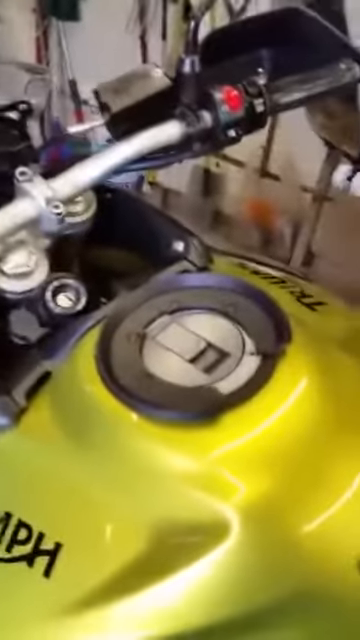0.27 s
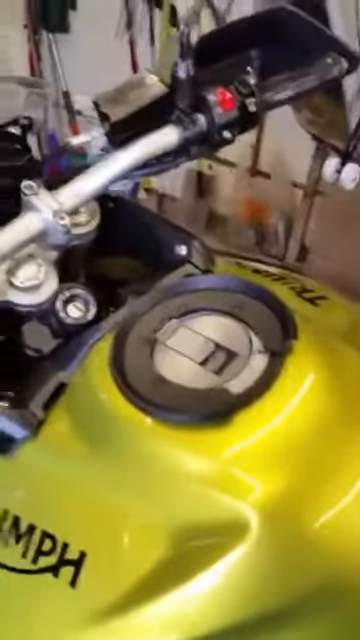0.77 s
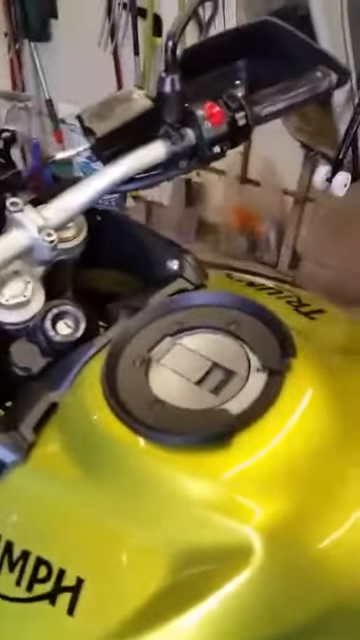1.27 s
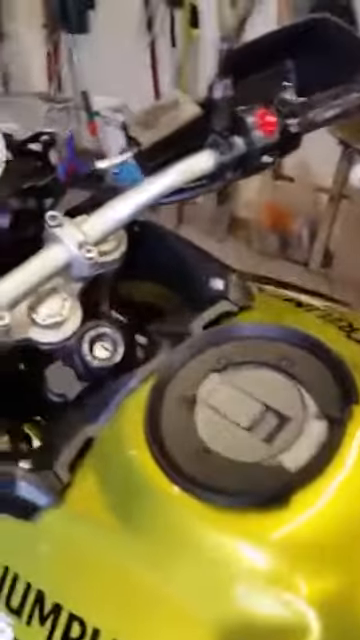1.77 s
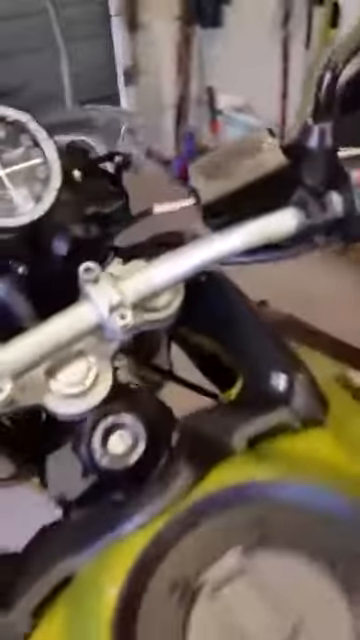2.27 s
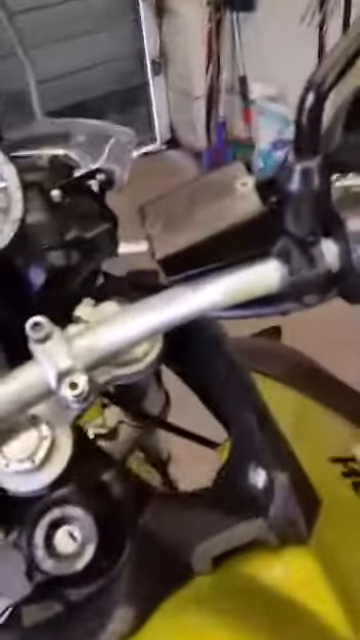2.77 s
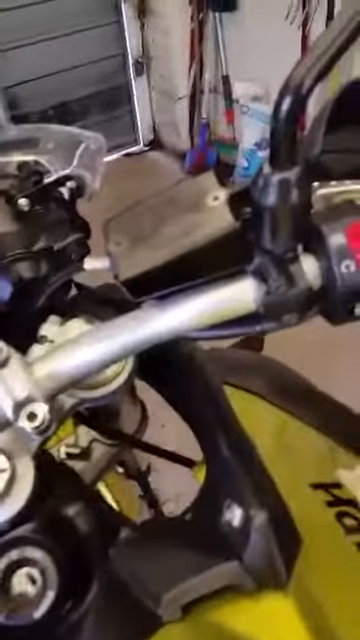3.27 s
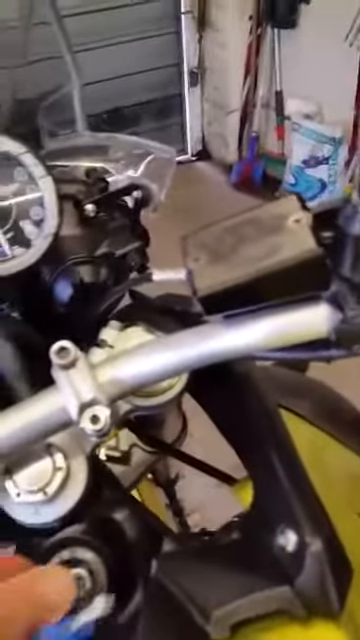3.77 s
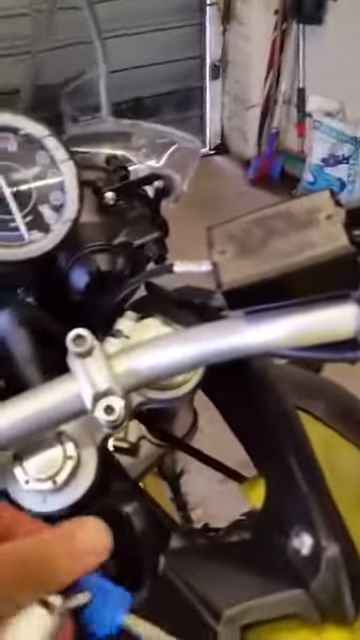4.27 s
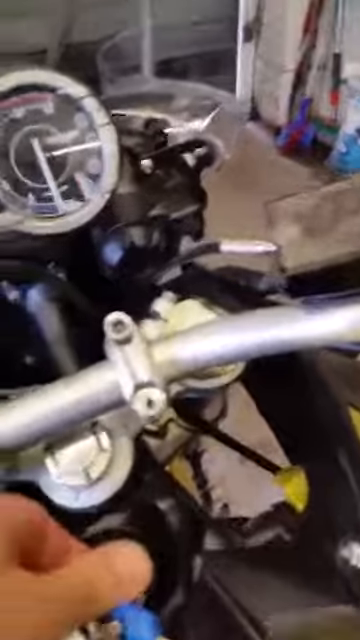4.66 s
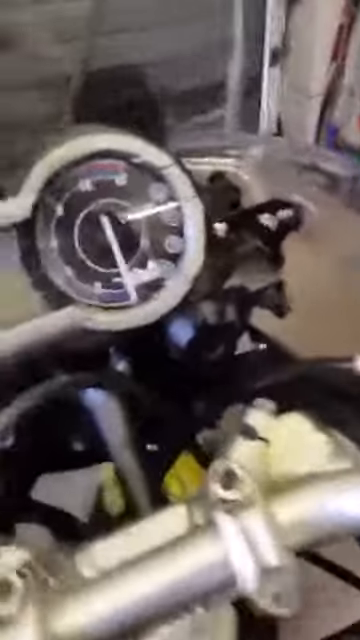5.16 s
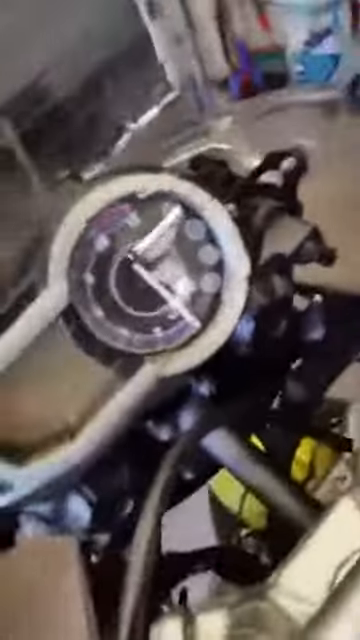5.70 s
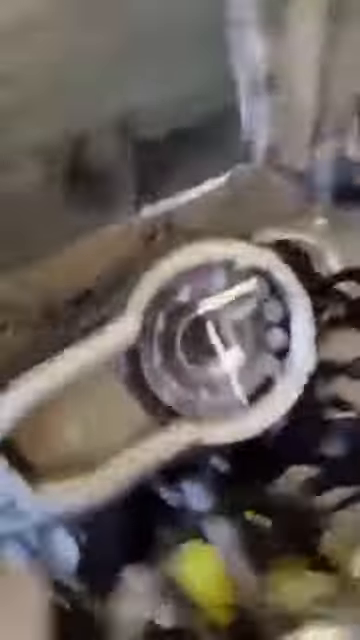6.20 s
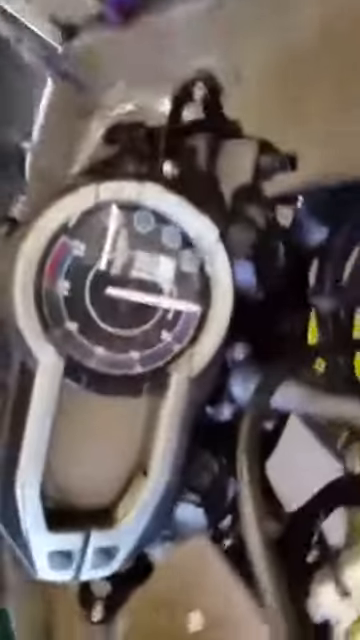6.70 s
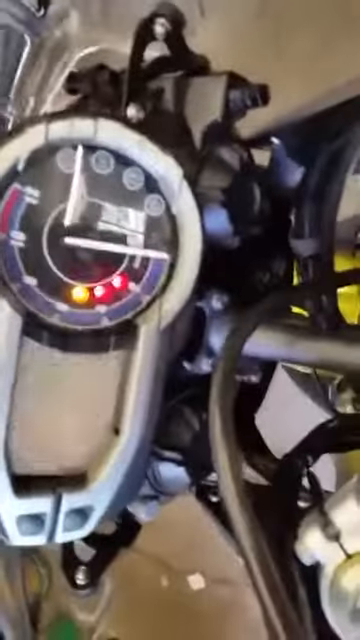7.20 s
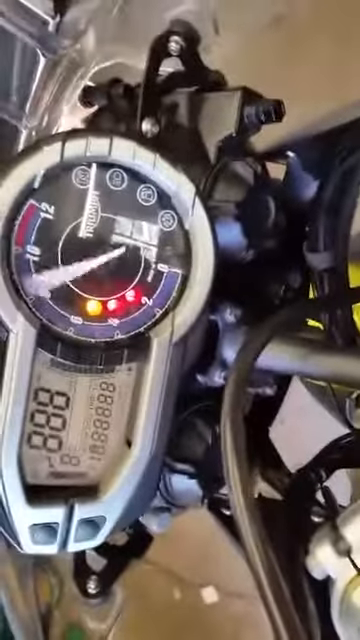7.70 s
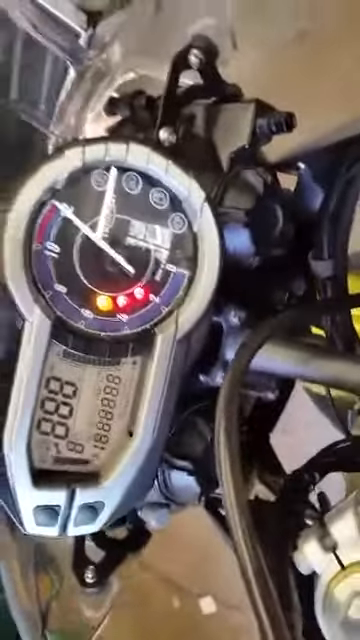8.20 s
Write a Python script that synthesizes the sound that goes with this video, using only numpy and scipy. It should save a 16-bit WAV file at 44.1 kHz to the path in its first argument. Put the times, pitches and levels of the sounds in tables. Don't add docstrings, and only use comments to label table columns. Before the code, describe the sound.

In a quiet humming garage, keys jingle softly, one scrapes into a metal lock, rattles about and snaps round with loud hollow clunks.

```python
import sys
import numpy as np
from scipy import signal
from scipy.fft import rfft, irfft
from scipy.io import wavfile
from scipy.ndimage import uniform_filter1d

SR = 44100
rng = np.random.default_rng(int(sys.argv[2]) if len(sys.argv) > 2 else 0)


def materialize(psi):
    bounded = np.clip(np.atleast_2d(psi).T, -1, 1)
    quanta = np.round(bounded * 32767).astype(np.int16)
    wavfile.write(sys.argv[1], SR, quanta)


def how_loud(loudness_db):
    steps = np.asarray(loudness_db, float) / 20
    return 10 ** steps


N = 372644


def evened(x):
    return x / np.sqrt(np.mean(x ** 2) + 1e-20)


def peaked(x):
    return x / (abs(x).max() + 1e-12)


def read(points, hz):
    f, value = np.transpose(points)
    return np.interp(np.log(hz + 1), np.log(f + 1), value)


def coloured(x, points):
    n = x.shape[-1]
    return irfft(rfft(x) * how_loud(read(points, np.fft.rfftfreq(n, 1 / SR))), n)


def follow(rows):
    when, level_db = np.transpose(rows)
    return np.interp(np.arange(N) / SR, when, level_db)


def ring(hz, db, t60, seconds):
    t = np.arange(round(seconds * SR))[:, None] / SR
    fading = how_loud(db - 60 * t / np.maximum(t60, .002))
    return (fading * np.sin(2 * np.pi * hz * t)).sum(1)


def grains(per_s, spread_db):
    size = how_loud(spread_db * np.minimum(rng.exponential(1, N), 4))
    return size * rng.choice([-1., 1.], N) * (rng.random(N) < per_s / SR)


# time_s, left_delay_samples, left_over_right_db
PLACE = [
    (0, 18, -14),
    (2.9, 19, -15),
    (3.199, 6.5, -4.5),
    (4.602, 5.5, -9.5),
    (5.202, 10.5, -11),
    (6.2, 13, -2.5),
    (6.7, 2, -4.5),
    (7.3, 0.5, -4.5),
    (7.697, 8.5, -3),
]


def add(mix, s, sound, pan_db=None):
    when, late, lean_db = np.transpose(PLACE)
    if pan_db is None:
        pan_db = np.interp(s, when, lean_db)
    at = round(s * SR)
    left_at = at + round(np.interp(s, when, late))
    for channel, start, db in ((0, left_at, pan_db / 2), (1, at, -pan_db / 2)):
        part = mix[channel, start:][:len(sound)]
        part += how_loud(db) * sound[:len(part)]


# pitch_hz, level_db (per Hz)
AIR = [(35, -23), (60, 9.5), (94, -2.5), (198, -8.5), (244, -2), (301, -10), (346, -18.5), (408, -17),
       (458, -19.5), (1040, -34.5), (6000, -51.5), (8000, -39.5), (14200, -42), (15300, -51)]
# pitch_hz, level_db (rms)
HUM = [(100, -93), (200, -77.5), (300, -76.5), (400, -87.5), (500, -98.5)]
# pitch_hz, level_db (per Hz)
WHINE = [(1800, -16), (2050, -11), (2300, -18.5), (2900, -25.5), (3750, -14), (4600, -25.5)]
AIR_DB, WHINE_DB = -73.5, -88


def stillness():
    a, b, c = rng.standard_normal((3, N))
    air = how_loud(AIR_DB) * evened(coloured(np.array([a + 0.2 * b, a - 0.09 * b]), AIR))
    waver = evened(uniform_filter1d(uniform_filter1d(c, 4000), 4000))
    t = np.arange(N) / SR
    hum = np.zeros((2, N))
    for hz, db in HUM:
        cycles = hz * t + rng.random((2, 1)) * 0.24
        hum += how_loud(db + 2.4 * waver) * np.sqrt(2) * np.sin(2 * np.pi * cycles)
    whine = how_loud(WHINE_DB) * evened(coloured(np.array([b, c]), WHINE))
    return air + hum + whine


# start_s, length_s, from_hz, to_hz, level_db (rms)
SONG = [
    (2.06, 0.14, 2070, 2175, -76),
    (2.223, 0.067, 1965, 2057, -83.5),
    (2.332, 0.15, 1980, 1997, -86),
    (2.712, 0.054, 2150, 1890, -79.5),
    (2.792, 0.097, 1680, 1650, -90.5),
    (2.99, 0.1, 2080, 2180, -95),
    (3.105, 0.096, 2250, 2660, -94.5),
    (3.176, 0.1, 2780, 2670, -92),
    (3.249, 0.068, 2730, 2810, -90.5),
    (3.254, 0.083, 2880, 2970, -96),
]
WARBLE_HZ, WARBLE_DEPTH = 37.9, 0.029


def bird():
    out = np.zeros((2, N))
    for s, length, from_hz, to_hz, db in SONG:
        u = np.arange(0, 1, 1 / (length * SR))
        t = s + length * u
        weak = db < -76
        wobble = 2 * np.pi * WARBLE_HZ * length * u + 1.5 * np.sin(2 * np.pi * 61 * t)
        hz = to_hz + (from_hz - to_hz) * (1 - u) ** 2
        hz = hz * (1 + WARBLE_DEPTH * weak * np.sin(wobble))
        shape = np.minimum(u / 0.38, 1) * np.minimum((1 - u) * length / 0.011, 1)
        shape *= 1 + .9 * weak * np.sin(2 * np.pi * 47 * t + 3 * np.sin(2 * np.pi * 17 * t))
        whistle = np.sin(2 * np.pi * np.cumsum(hz) / SR)
        add(out, s, how_loud(db + 6.0) * shape * whistle, -2.5)
    return out


# pitch_hz, t60_s
GARAGE = [(300, 0.45), (1000, 0.22), (3000, 0.23), (8000, 0.22), (15000, 0.26)]


def garage(x):
    taps = np.zeros((3, 2, 24000))
    at = np.arange(200, 23980, 20) + rng.integers(0, 20, (3, 2, 1189))
    np.put_along_axis(taps, at, rng.choice([-1., 1.], at.shape), 2)
    hz, t, z = signal.stft(taps, SR, nperseg=256)
    fading = how_loud(-60 * t / read(GARAGE, hz)[:, None])
    tails = signal.istft(z * fading, SR, nperseg=256)[1]
    tails = tails / np.linalg.norm(tails[0, 0])
    turn = np.pi * (np.arange(N) / SR * 7 + np.arange(3)[:, None] / 3)
    fed = x[1] * np.cos(turn) * np.sqrt(2 / 3)
    return signal.fftconvolve(fed[:, None], tails, axes=2)[..., :N].sum(0)


# time_s, level_db
GRIP = [(0, -61.5), (.56, -58.5), (1.2, -71.5), (1.55, -60.5), (1.9, -60.5), (2.4, -66.5), (3.1, -74),
        (3.95, -69.5), (4.31, -59.5), (5.27, -52), (5.8, -57.5), (5.93, -46.5), (6.1, -55), (6.7, -53),
        (7.3, -62.5), (8.45, -67.5)]
# pitch_hz, level_db (per Hz)
RUMBLE = [(8.8, -12.5), (15, -3.5), (45, 1.5), (108, -3.5), (172, -5), (207, -4), (238, -15.5), (300, -6.5),
          (344, -15.5), (600, -22.5), (780, -44), (1320, -120)]
# start_s, peak_db, pitch_hz, left_over_right_db
THUMPS = [(1.307, -51, 134, 19), (1.735, -45, 176, 15), (1.782, -44, 84, 23), (1.823, -43.5, 119, 17),
          (1.966, -44.5, 103, 18), (2.345, -52.5, 82.6, 28), (2.667, -40, 332, -2),
          (3.253, -35.5, 96, 14.5), (3.598, -40.5, 89.6, 16), (4.772, -48, 64, 3), (5.18, -32, 183, -5),
          (5.752, -42.5, 134.5, 26), (5.795, -47.5, 127, 37), (5.938, -36, 57, 26.5), (5.972, -31, 111, 21),
          (6.282, -25, 223, -3), (8.027, -34.5, 180, 14), (8.331, -45.5, 122.6, 12)]


def handling():
    a, b, c = rng.standard_normal((3, N))
    lumps = evened(uniform_filter1d(uniform_filter1d(c, 1200), 1200))
    rumble = evened(coloured(np.array([a + .2 * b, b]), RUMBLE))
    out = rumble * how_loud(2.5 * lumps) * how_loud(follow(GRIP))
    for s, peak_db, hz, pan_db in THUMPS:
        cycles = np.arange(round(2.4 * SR / hz)) * hz / SR
        shape = np.sqrt(cycles) * (1 - cycles / cycles[-1]) ** 2.97
        bump = np.sin(2 * np.pi * cycles ** 0.77) * shape
        add(out, s, how_loud(peak_db) * bump, pan_db)
    return out


# time_s, level_db
RUSTLE = [(0, -77), (.15, -89), (.42, -71), (.6, -76), (.74, -81.5), (.83, -88), (.92, -82.5), (1.1, -94),
          (1.43, -100), (1.63, -87.5), (1.8, -85.5), (2.35, -89), (2.6, -94), (2.73, -99.5), (2.9, -100.5),
          (3.3, -106)]
# pitch_hz, level_db (per Hz)
CLOTH = [(210, -43.5), (350, 0), (643, -5), (950, -8.5), (1680, -17.5), (6430, -23), (9140, -20.5),
         (14500, -11), (15000, -15.5), (15500, -54)]


def rustle():
    a, b = grains(11000, 3), grains(8000, 3)
    cloth = evened(coloured(np.array([np.roll(a, 17) + 2.3 * b, a - 0.061 * b]), CLOTH))
    t = np.arange(N) / SR
    moving = (t >= RUSTLE[0][0]) * (t < RUSTLE[-1][0])
    return how_loud(12.5) * how_loud(follow(RUSTLE)) * moving * cloth


# start_s, peak_db, centre_hz
SKITTERS = [(1.598, -61, 6000), (2.7265, -55, 13500), (4.384, -51.5, 9000), (4.512, -44, 12200),
            (4.522, -41, 12000), (4.528, -34.5, 12400), (4.533, -44.5, 12000), (4.549, -35, 11080),
            (4.563, -45.5, 11000), (4.5692, -32, 8100), (4.584, -41.5, 9000), (4.83, -64, 10800),
            (4.858, -51, 12000), (4.938, -49, 12500), (4.947, -53, 12500)]


def skitters():
    out, t = np.zeros((2, N)), np.arange(500) / SR
    for (s, db, hz), draw in zip(SKITTERS, rng.standard_normal((len(SKITTERS), len(t)))):
        band = [(hz / 3, -22), (hz * .8, 0), (hz * 1.2, 0), (hz * 2, -10)]
        add(out, s, how_loud(db) * peaked(coloured(draw, band) * how_loud(-60 * t / .016)))
    return out


# pitch_hz, level_db
SHEEN = [(3910, -12), (5970, 1.5), (9860, 1.5), (11000, -3.5), (11900, 5), (12900, 0), (13900, 2),
         (14700, -1.5)]
SHEEN_WIDTH_HZ = 260
# start_s, level_db (rms), t60_s
SHIVERS = [
    (7.083, -34, 0.39),
    (7.107, -38, 0.29),
    (4.404, -56.5, .3),
]


def shimmer():
    out, t = np.zeros((2, N)), np.arange(16000) / SR
    f = np.fft.rfftfreq(len(t), 1 / SR)
    bands = sum(how_loud(db) / (1 + (2 * (f - hz) / SHEEN_WIDTH_HZ) ** 2) for hz, db in SHEEN)
    for (s, db, t60), draw in zip(SHIVERS, rng.standard_normal((len(SHIVERS), len(t)))):
        jangle = evened(irfft(rfft(draw) * bands))
        add(out, s, jangle * how_loud(db - 60 * t / t60) * (1 - np.exp(-t / .003)))
    return out


# pitch_hz, level_db, t60_s
SMALL_KEY = [(4850, -26, .05), (8360, -4, .09), (9560, -6, .05), (9540, -9, .15), (10980, 8, .085),
             (14360, 4, .11)]
LONG_KEY = [(5033, -30, .05), (7090, -16.5, .05), (10690, -5.5, .1), (11850, -8.5, .12), (12200, 3.5, .08),
            (12000, -1, .09), (14000, -8, .1), (13440, -5.5, .12)]
# pitch_hz, level_db (per Hz)
TICK = [(1400, -42.5), (2600, 0), (5500, 3.5), (8500, 5)]


def key_touch(ring_db, long_db, tick_hz, tick_db, noisiness, luck):
    hz, db, t60 = np.transpose(SMALL_KEY + LONG_KEY)
    on_long = np.arange(len(hz)) >= len(SMALL_KEY)
    share, bend, noise = np.split(luck, [len(hz), 2 * len(hz)])
    t = np.arange(len(noise)) / SR
    struck_db = db + long_db * on_long + 1.8 * share

    sound = how_loud(ring_db) * peaked(ring(hz * (1 + .002 * bend), struck_db, t60, .25))
    flutter = np.interp(np.linspace(0, 70, len(sound)), np.arange(len(noise)), noise)
    sound *= 1 + .5 * flutter
    sound[:len(t)] *= 1 - np.exp(-t / .0006)

    snap = ring(hz * (1 + .02 * bend), struck_db, .014, len(t) / SR) * .3
    snap = peaked(snap + noisiness * noise * how_loud(-60 * t / .007))
    snap = coloured(snap, [(6000, -37), (9000, 14)])
    snap *= np.sqrt(max(1 - how_loud(2 * min(tick_db, 0)), .03))

    tick = peaked(coloured(noise[::-1] * how_loud(-60 * t / .005), TICK))
    band = [(tick_hz / 3, -45), (tick_hz / 1.5, -14), (tick_hz, 0), (tick_hz * 1.9, -16)]
    tick = peaked(tick + 0.61 * peaked(coloured(noise * how_loud(-60 * t / 0.015), band)))
    sound[:len(t)] += (snap + how_loud(tick_db + 5.5) * tick) * np.cos(np.pi / 2 * t / t[-1])
    return sound


# start_s, peak_db, ring_over_snap_db, long_over_small_key_db
JINGLES = [(0.048, -50.5, -5, -18), (0.065, -60, 19, -15), (0.649, -69, 17, 6), (0.6838, -58, 16, 10),
           (0.7085, -51, 14, 8), (0.717, -57, 14, 5), (0.7247, -43.5, 6, 3), (0.744, -49.5, 2, -10),
           (0.84, -67, -1, -6), (0.857, -50, 15.5, -3), (0.873, -61, 2, -6), (0.9067, -37.5, 9.5, -12),
           (0.9294, -52, 0, -6), (0.95, -60, -8, -6), (1.189, -70, 6, -16)]
# start_s, peak_db, ring_over_snap_db, long_over_small_key_db
TOSSED = [
    (1.455, -33.5, -3, 0.5),
    (1.4989, -25.5, -17, 0.5),
    (1.5063, -43.5, -15, 1.5),
    (1.5255, -47.5, -14, 2),
    (2.8435, -68, -12, -1.5),
    (4.508, -34.5, -15, 7.5),
    (4.818, -57, -16, -6.5),
    (4.8838, -59, -13, 0),
    (4.9424, -55, -12, -3),
    (4.9543, -43, -10, -4),
]
# start_s, peak_db, ring_over_snap_db, tick_hz
PINCHED = [(1.479, -54, -25, 3000), (1.549, -53, -20, 5000), (1.554, -44, -22, 5170),
           (1.5596, -37.5, 6, 5400), (1.578, -37.5, -20, 5570), (1.586, -55, -20, 5000),
           (1.6079, -24.5, -18, 5740), (1.618, -48, -20, 3630), (1.625, -39.5, -23, 4360),
           (1.6284, -44, -15, 4500), (1.671, -52, -16, 4000), (1.794, -48.5, -20, 3450),
           (1.855, -62, -25, 5540), (1.891, -62, -16, 5660), (1.899, -56.5, -26, 3260),
           (1.911, -66, -25, 3400), (1.932, -54, -24, 4050), (1.993, -58, -25, 2950),
           (2.004, -62, -21, 3400), (2.019, -64, -20, 3300), (2.061, -65.5, -20, 5000),
           (2.129, -65, -24, 2980), (2.178, -67, -25, 5000), (2.184, -59, -31, 3500),
           (2.245, -69, -16, 5270), (2.45, -67, -30, 6000), (2.72, -48, 6, 3580), (3.372, -68, -25, 4600),
           (4.54, -52, -10, 6050), (4.576, -41, -26, 5000), (4.9662, -47, -4, 4350),
           (7.8244, -38, -32, 5960)]
LOOSE_TICK_HZ = 5000
DANGLING_TICK_DB, LOOSE_TICK_DB, PINCHED_TICK_DB = -32, -11.5, 0


def clinks():
    out = np.zeros((2, N))
    touches = [(*row, LOOSE_TICK_HZ, DANGLING_TICK_DB, .25) for row in JINGLES]
    touches += [(*row, LOOSE_TICK_HZ, LOOSE_TICK_DB, .9) for row in TOSSED]
    for s, peak_db, ring_db, tick_hz in PINCHED:
        touches.append((s, peak_db, ring_db, 0, tick_hz, PINCHED_TICK_DB, .25))
    luck = rng.standard_normal((len(touches), 2 * len(SMALL_KEY + LONG_KEY) + 600))
    for (s, peak_db, *touch), draw in zip(touches, luck):
        add(out, s, how_loud(peak_db) * key_touch(*touch, draw))
    return out


# pitch_hz, level_db, t60_s
FRAME = [(452, 1.5, 0.22), (488.4, 7.5, 0.13), (636.3, 4.5, 0.17), (760.5, 1.5, 0.22), (830, 19.5, 0.0077),
         (1000, 6.5, 0.056), (1186.5, 6, 0.053), (1318, 10, 0.033), (1412, 2, 0.076), (1634, 1, 0.075),
         (2150, -23.5, 0.12), (350, 5.5, 0.15), (2710, -18.5, 0.06), (3700, -32, 0.011)]
# pitch_hz, level_db, t60_s
PINS = [(2170, -6.5, 0.012), (2576, -7, 0.016), (2948, 1.5, 0.0099), (4050, -12.5, 0.019)]
# pitch_hz, level_db (per Hz)
EDGE = [(1200, -9.5), (1800, 1.5), (2400, 7.5), (3000, 3), (4200, -5), (5000, -32), (8000, -57)]
# pitch_hz, level_db (per Hz)
CRACK = [(1530, -36), (2600, -6), (4330, -5), (6050, -8), (7890, -7), (9190, -10.5), (9690, -4.5),
         (14300, -3), (15500, -8.5), (16000, -42.5)]


def jolt(row, swell, first, luck):
    peak_db, pitch_hz, edge_db, crack_db = row
    hz, db, t60 = np.transpose(FRAME)
    n = len(swell)
    share, dice, noise, fizz = np.split(luck, len(FRAME) + n * np.arange(3))
    blows = swell * noise * (dice > (1.6 if first else 0.7))
    blows[0] = first

    near_db = -15 * abs(np.log2(hz / pitch_hz))
    barrel = ring(pitch_hz, 0, .015, .25)
    body = barrel + how_loud(-6.0) * ring(hz, db + near_db + 0.66 * share, t60, .25)
    band = [(pitch_hz / 3, -21), (pitch_hz * .8, 0), (pitch_hz * 1.6, 0), (pitch_hz * 3, -14),
            (pitch_hz * 6, -32)]
    body = coloured(np.roll(body, 40), band)
    body *= np.linspace(1, 0, len(body)) ** 2
    sound = peaked(signal.fftconvolve(blows, body))[40:]

    late = swell * (1 - np.exp(-np.arange(n) / SR / 0.001))
    pins = signal.fftconvolve(noise * late, ring(*np.transpose(PINS), .03))[:n]
    edge_colour = [(f * (pitch_hz / 1000) ** .4, v) for f, v in EDGE]
    edge = peaked(coloured(noise * late, edge_colour))
    crack_colour = [(f, v + 0.5 * crack_db * np.log2(f / 5000)) for f, v in CRACK]
    sound[:n] += how_loud(edge_db + 2.5) * peaked(edge + 0.53 * peaked(pins))
    sound[:n] += how_loud(crack_db + 2.5) * peaked(coloured(fizz * late, crack_colour))
    return how_loud(peak_db) * sound


HARD_DB = -24.5
CHATTER_S, HARD_CHATTER_S = 0.0073, 0.0023


def blow(row, draw):
    hard = row[0] > HARD_DB
    u = np.arange(3000) / SR / (HARD_CHATTER_S if hard else CHATTER_S)
    swell = (1 - np.exp(-(5.5 if hard else 3.0) * u)) * np.exp(-u)
    return jolt(row, swell, 0.36 + 0.8 * hard, draw)


# start_s, peak_db, barrel_hz, rattle_edge_db, metal_crack_db
EXTRA_BLOWS = [
    (4.128, -30, 503, -30, -44),
    (4.162, -40, 477, -29, -50),
    (4.406, -24.5, 473, -30, -47.5),
    (5.018, -27, 505, -34, -50),
    (5.246, -31.5, 892, -7, -40),
    (7.077, -30.5, 900, -12.5, -15),
    (7.129, -25, 1307, -18.5, -41),
    (7.69, -29, 624.6, -31, -48.5),
    (7.722, -28, 638, -30, -48),
]


def extra_blows():
    out = np.zeros((2, N))
    for (s, *row), draw in zip(EXTRA_BLOWS, rng.standard_normal((len(EXTRA_BLOWS), len(FRAME) + 9000))):
        add(out, s, blow(row, draw))
    return out


# pitch_hz, level_db, t60_s
BARREL = [(1190, 3, 0.012), (1307, 2, 0.024), (1430, 3, 0.0095), (2500, -16.5, 0.037)]
# start_s, length_s,
# drag_db, glide_fizz_db, barrel_buzz_db
STROKES = [(0.655, 0.32, -99, -64.5, -99), (0.843, 0.37, -99, -69.5, -99), (1.448, 0.33, -99, -62, -99),
           (1.53, 0.47, -99, -63, -99), (2.257, 0.55, -99, -76.5, -99), (2.664, 0.223, -68.5, -83.5, -99),
           (4.121, 0.29, -38.5, -45.5, -47), (4.362, 0.41, -42.5, -50.5, -72),
           (4.546, 0.041, -51, -49.5, -45.5), (4.689, 0.71, -66.5, -77.5, -72.5),
           (4.93, 0.72, -51, -85, -71), (5.211, 0.49, -44.5, -68, -71), (5.446, 2.45, -65.5, -79.5, -86.5),
           (6.457, 0.18, -62, -100, -55.5), (6.605, 0.2, -59, -97.5, -54), (6.694, 0.53, -47, -74, -65),
           (6.981, 0.33, -63, -85, -46.5), (7.083, 0.24, -43.5, -40, -57),
           (7.199, 0.71, -71.5, -79.5, -73.5), (7.383, 0.07, -76, -86, -62), (7.59, 0.17, -65, -89, -68),
           (7.655, 0.5, -47.5, -82, -54), (7.804, 0.18, -57, -79, -44), (7.93, 0.87, -76.5, -81.5, -88)]
STROKE_LEAN = 0.35


def scrape():
    hz, db, t60 = np.transpose(FRAME)
    slips = grains(1500, 2)
    drag = evened(signal.oaconvolve(slips, ring(hz, db, 0.051 * t60, 0.065))[:N])
    drag = drag + how_loud(-6.0) * evened(coloured(slips, EDGE))
    buzz = evened(signal.oaconvolve(slips[::-1], ring(*np.transpose(BARREL), .06))[:N])
    pressed, gliding, buzzing, bright = np.zeros((4, N))
    for start, length, drag_db, fizz_db, buzz_db in STROKES:
        u = np.clip((np.arange(N) / SR - start) / length, 0, 1)
        arch = np.sin(np.pi * u ** STROKE_LEAN) ** 2
        pressed += how_loud(drag_db) * arch
        gliding += how_loud(fizz_db) * arch
        buzzing += how_loud(buzz_db) * arch
        bright += how_loud(fizz_db) * arch ** 1.1
    fizz = np.array([evened(coloured(grains(10000, 2.6), CRACK)) for side in "LR"])
    dull = coloured(fizz, [(7000, -8.5), (12000, -15.5)])
    fizz = dull * gliding + (fizz - dull) * bright
    return np.array([np.roll(drag, 8), drag]) * pressed + np.array([np.roll(buzz, 4), buzz]) * buzzing + fizz


# start_s, peak_db, barrel_hz, rattle_edge_db, metal_crack_db
SEATING = [(3.376, -71, 892, -9, -7), (3.846, -64.5, 625, -32, -13.5), (4.068, -53, 411, -21, -17.5),
           (4.128, -19, 830, -14.5, -7), (4.149, -29, 680, -10.5, -9), (4.365, -43.5, 690, 5, 1),
           (4.404, -14.5, 934, -7, -2), (4.43, -30.5, 830, -13, -28.5), (4.484, -29.5, 875, -11, -28),
           (4.761, -47.5, 900, -31, -24), (4.855, -36.5, 760, -29, -48), (5.227, -29.5, 683, -12.5, -38),
           (5.362, -20.5, 1070, -19.5, -41), (5.663, -50, 796, -18.5, -19),
           (5.959, -43.5, 590, -14.5, -48.5), (6.004, -36, 1000, -19.5, -54), (6.339, -46, 591, -15.5, -38)]
# start_s, peak_db, barrel_hz, rattle_edge_db, metal_crack_db
DETENTS = [(6.468, -32.5, 614, -13.5, -56), (6.61, -41, 706, -17.5, -38.5), (6.713, -25.5, 740, -3, -13),
           (6.846, -18, 1250, -12.5, -28), (6.891, -22, 1283, -29, -28), (7.0824, -28, 770, 5.5, 15),
           (7.109, -20.5, 1280, -27.5, -30), (7.118, -23, 1370, -28, -25), (7.394, -45.5, 737, -36.5, -35),
           (7.462, -50, 655, -35, -31.5), (7.609, -39.5, 1050, -43.5, -40.5),
           (7.6444, -25.5, 1320, -8.5, -35), (7.6876, -10, 1430, -12, -52.5),
           (7.7055, -21.5, 1420, -27.5, -38), (7.7156, -14, 1416, -11.5, -27.5),
           (7.72, -17, 1433, -1.5, -13), (7.739, -19.5, 1338, -23.5, -27.5),
           (7.8341, -33.5, 1450, -20, -41), (7.86, -24.5, 1490, -31.5, -32), (7.876, -24.5, 1240, 4, -12)]
# middle_s, peak_db, barrel_hz, rattle_edge_db, metal_crack_db
TWISTS = [(2.685, -63.5, 414, -13.5, -15), (4.176, -29.5, 940, -9.5, -13), (4.58, -35, 938, -15, -11.5),
          (4.6, -35.5, 840, -30, -38.5), (4.737, -54, 960, -29, -19), (4.84, -47, 580, -35, -51),
          (4.973, -46.5, 946, -32.5, -23.5), (4.998, -30, 911, -22, -24), (5.012, -24.5, 905, -19.5, -17.5),
          (5.029, -27.5, 708, -2, -11.5), (5.051, -24.5, 970, -37, -34), (5.136, -23, 1100, -12.5, -35),
          (5.148, -23, 1000, -12, -20.5), (5.25, -26, 1018, -15.5, -24), (5.286, -16, 975, -15.5, -35.5),
          (5.302, -16.5, 1000, -11, -20), (5.312, -27.5, 717, -30, -33), (6.63, -38, 628, -19, -35),
          (6.676, -35, 732, -13.5, -34), (6.692, -28.5, 1300, -23.5, -49.5),
          (6.722, -28.5, 1250, -5.5, -30.5), (6.737, -33.5, 752, -10.5, -34.5),
          (7.006, -45, 1268, -34.5, -46), (7.028, -59, 1315, -25, -46.5), (7.249, -40.5, 1270, -33, -33),
          (7.851, -36, 1410, -12.5, -42), (7.869, -18.5, 1415, -9, -47), (7.886, -19.5, 1224, -27, -32.5)]
TWIST_S = .024


def knocks():
    out, t = np.zeros((2, N)), np.arange(3000) / SR
    luck = rng.standard_normal((len(SEATING + DETENTS + TWISTS), len(FRAME) + 3 * len(t)))
    for (s, *row), draw in zip(SEATING + DETENTS, luck):
        add(out, s, blow(row, draw))
    swell = np.sin(np.pi * np.clip(t / TWIST_S, 0, 1)) ** 2
    for (s, *row), draw in zip(TWISTS, luck[::-1]):
        add(out, s - TWIST_S / 2, jolt(row, swell, 0, draw))
    return out


# pitch_hz, level_db
RADIATES = [(200, -26), (310, -14.5), (380, -0.5)]


def scene():
    background = stillness() + handling() + rustle()
    song, keys = bird(), clinks()
    lock = coloured(knocks() + scrape(), RADIATES)
    aftermath = coloured(extra_blows() + skitters() + shimmer(), RADIATES)
    echo = garage(how_loud(-12.5) * keys + how_loud(-7.5) * lock + how_loud(1.0) * song)
    return background + how_loud(-1.0) * song + keys + lock + aftermath + echo


# pitch_hz, level_db
MIC = [(6000, 3), (8000, -2.5), (9200, -8), (10500, -6.5), (15000, -5), (15500, -18.5), (16400, -20.5),
       (16700, -64)]
HEADROOM = .45


def microphone(air):
    return coloured(HEADROOM * np.tanh(air / HEADROOM), MIC)


def roll_off(x):
    return signal.sosfilt(signal.butter(12, 16480, fs=SR, output="sos"), x)


def record(dry):
    mix = microphone(dry)
    return roll_off(mix)


dry = scene()
out = record(dry)
materialize(out)
```